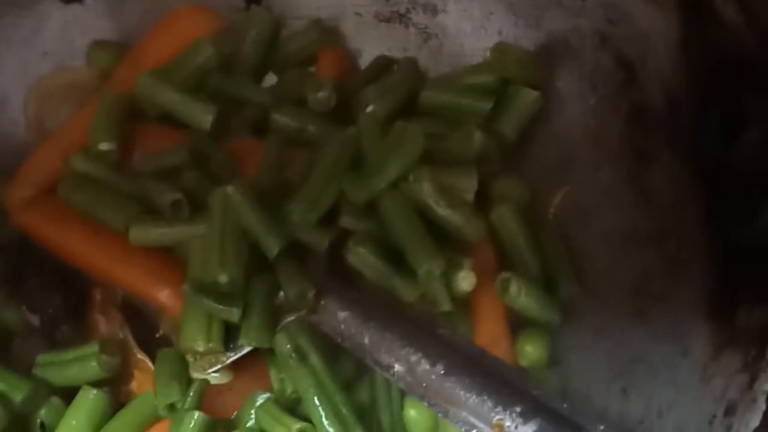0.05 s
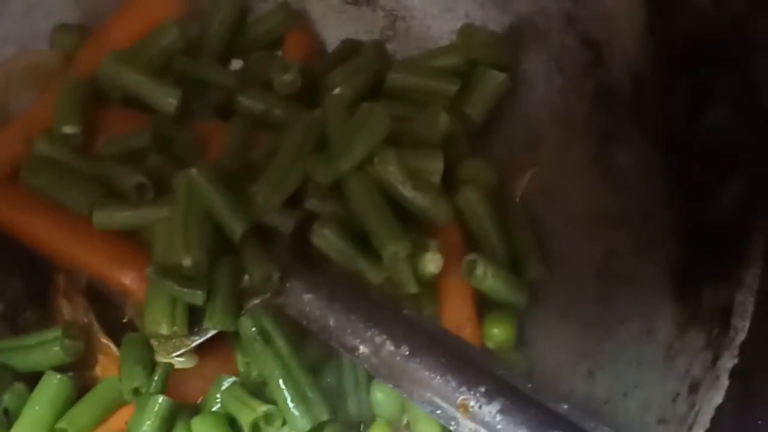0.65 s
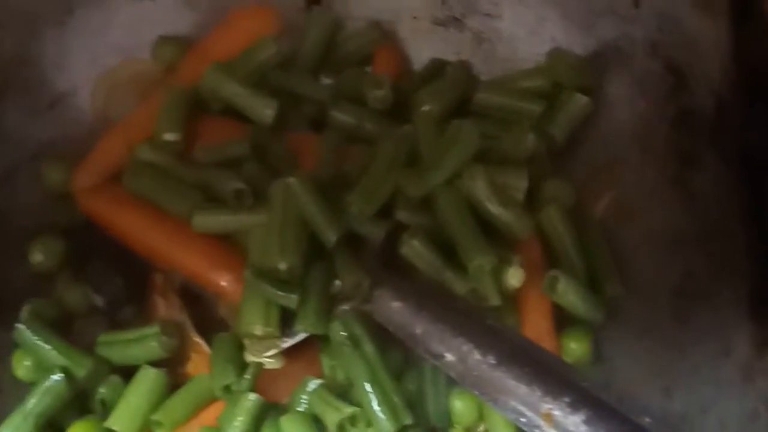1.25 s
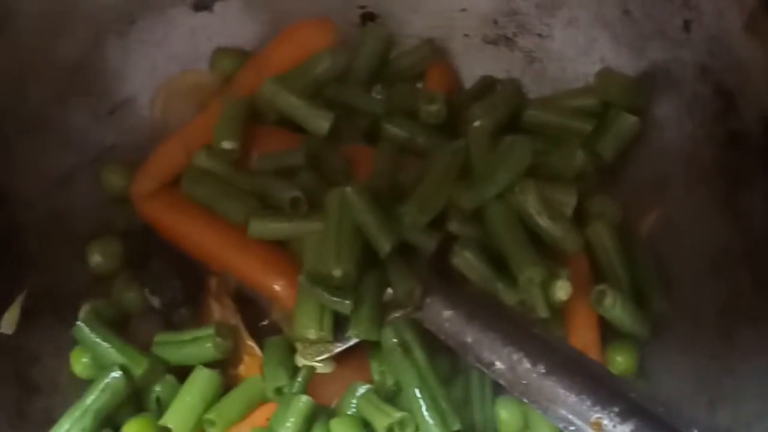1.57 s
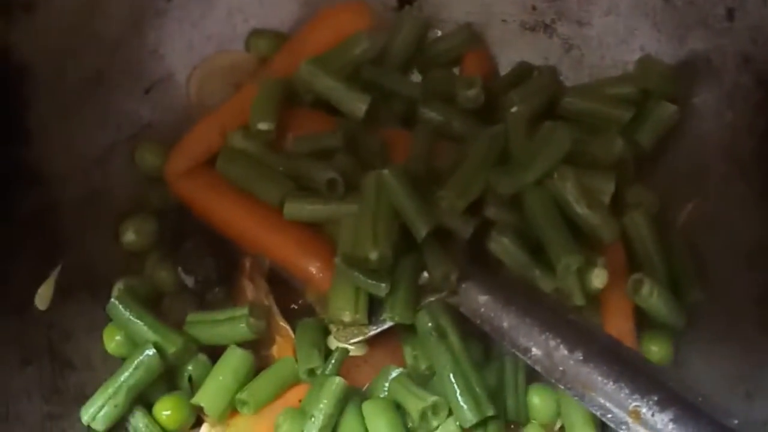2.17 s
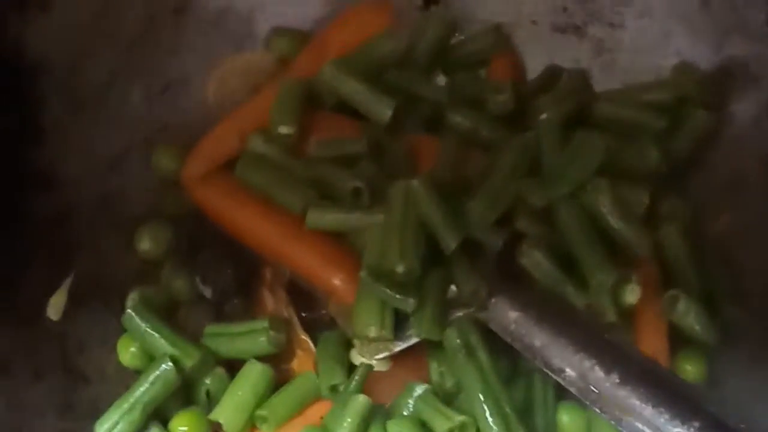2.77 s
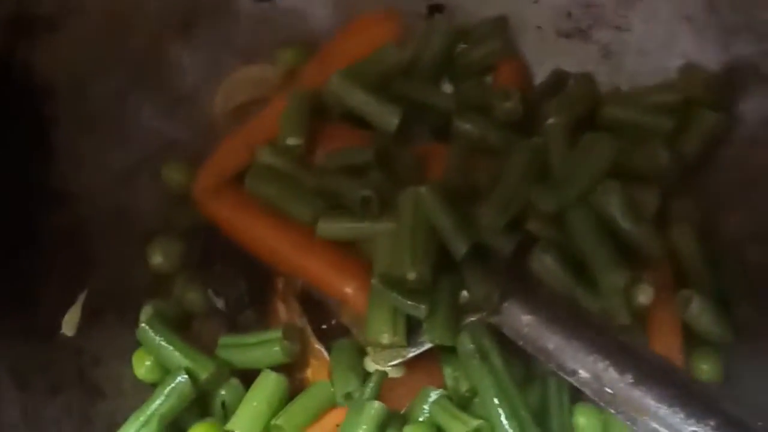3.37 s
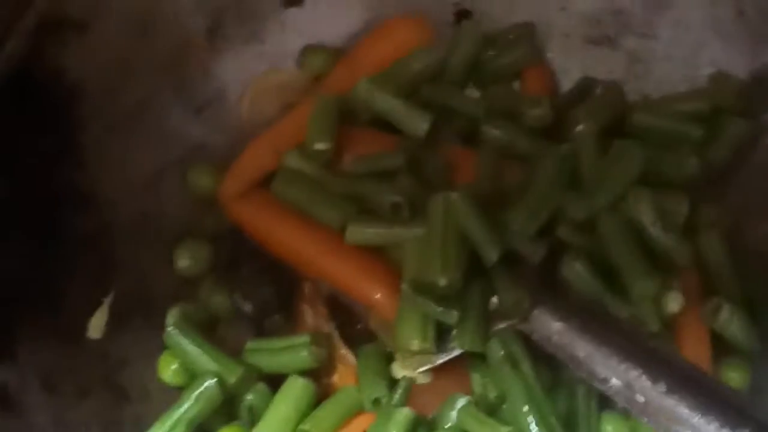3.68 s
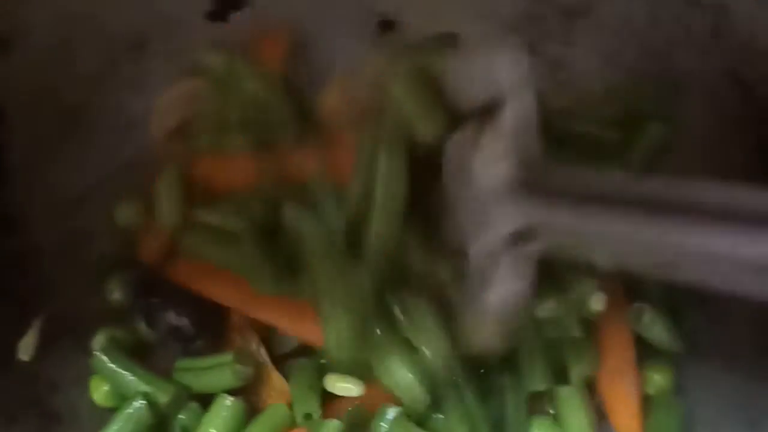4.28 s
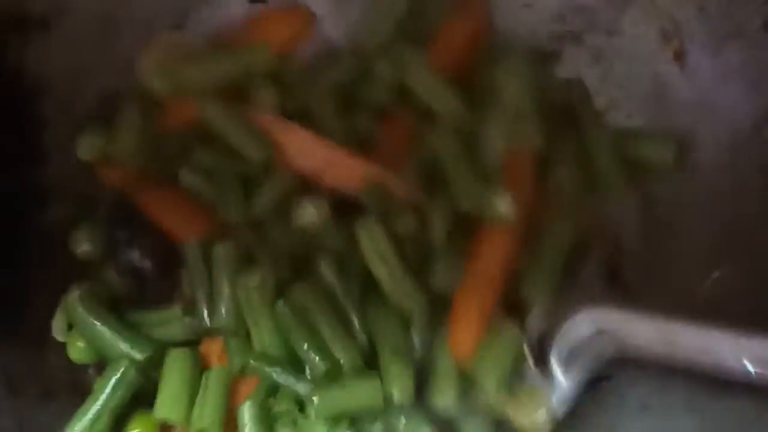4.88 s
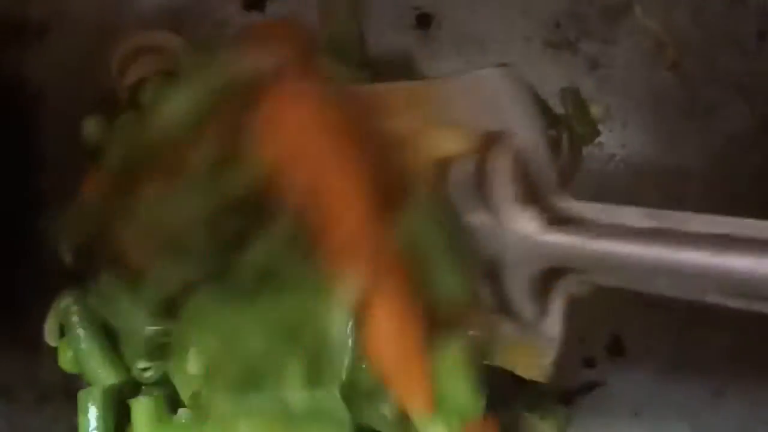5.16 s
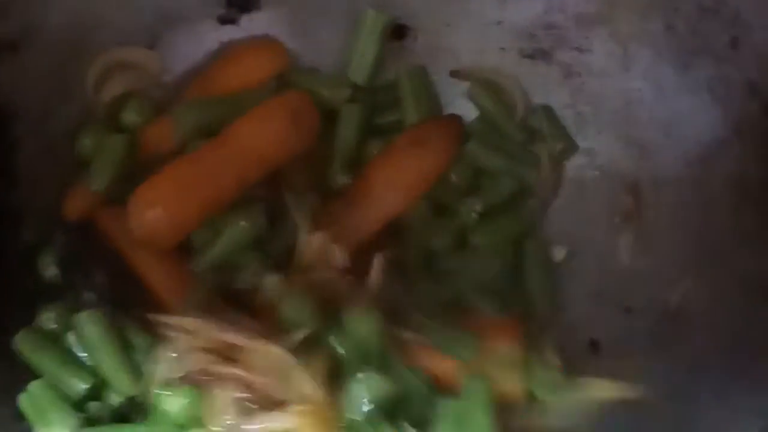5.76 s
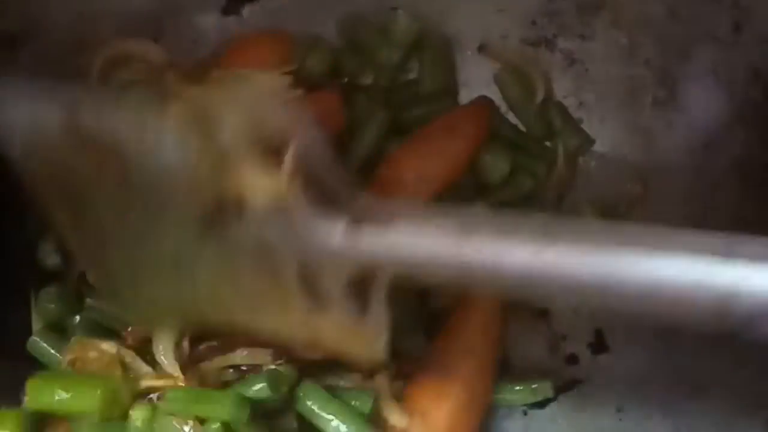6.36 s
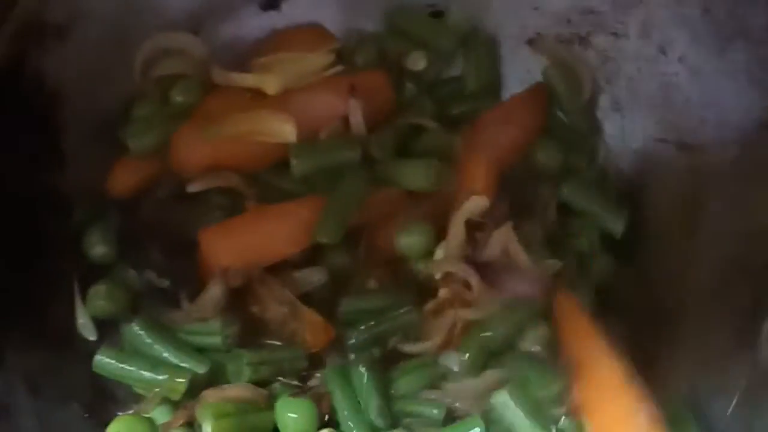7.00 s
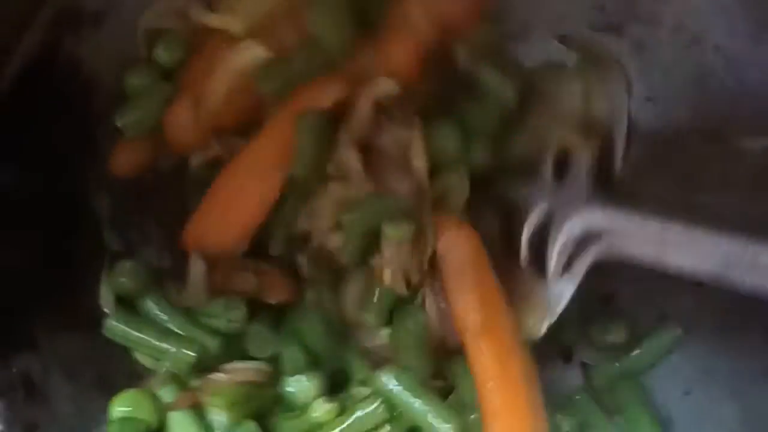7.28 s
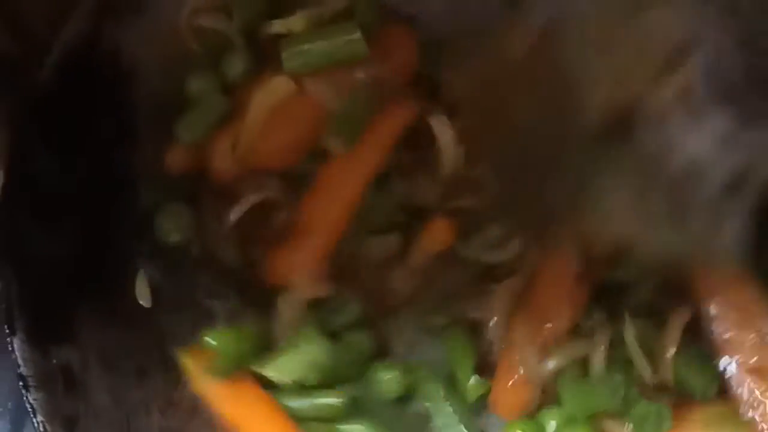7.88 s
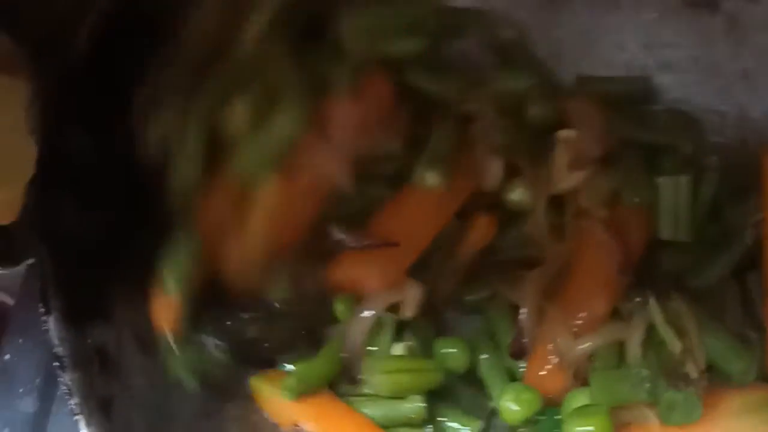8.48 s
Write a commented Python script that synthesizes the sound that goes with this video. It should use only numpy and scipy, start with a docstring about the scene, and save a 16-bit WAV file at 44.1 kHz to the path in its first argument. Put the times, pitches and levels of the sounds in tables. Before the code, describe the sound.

A bright, close sizzle of vegetables frying in a wok, joined halfway by the clacks and rasping scrapes of a metal spatula.

```python
"""A bright, crackling sizzle: vegetables fry in hot oil in a thin metal wok, close by, in a small kitchen.
Tiny steam bubbles burst all the time, larger ones spit, and the shifting pan gives soft thuds.
From about 4.5 seconds a metal spatula turns the food: its blade clacks and sets the pan ringing,
its edge sticks and slips in rasps and squeaks, the sizzle swells, and the pieces tumble back."""
import sys
import numpy as np
from scipy import signal
from scipy.fft import rfft, irfft, next_fast_len
from scipy.io import wavfile
from scipy.ndimage import uniform_filter1d

SR = 44100
rng = np.random.default_rng(int(sys.argv[2]) if len(sys.argv) > 2 else 0)


def unload_audio(sound):
    """Save the sound as a 16-bit wav file, at the path given as the first command line argument."""
    columns = np.transpose(np.atleast_2d(sound))
    # keep every value between -1 and 1, then stretch to whole-number steps
    steps = np.round(np.clip(columns, -1, 1) * 32767)
    wavfile.write(sys.argv[1], SR, steps.astype(np.int16))


N = 385434
TIME = np.arange(N) / SR
FREQS_HZ = np.fft.rfftfreq(4096, 1 / SR)  # a "colour" is one level in dB for each of these


def amp(db):
    """Turns decibels into a number to multiply by."""
    return 10 ** (np.asarray(db) / 20)


def evened(x):
    """Scales a sound to an average (rms) level of 1."""
    return x / np.sqrt(np.mean(x ** 2) + 1e-20)


def peaked(x, size=176):
    """Scales a sound so its loudest few milliseconds have level 1."""
    return x / np.sqrt(uniform_filter1d(x ** 2, size, mode="constant").max() + 1e-20)


def curve(rows):
    """Joins (time_s, value) points with straight lines."""
    return np.interp(TIME, *np.transpose(rows))


def spectrum(points):
    """Joins (pitch_hz, level_db) points into a colour."""
    hz, db = np.transpose(points)
    return np.interp(np.log(FREQS_HZ + 1), np.log(hz), db)


def bump(hz, width_hz):
    """A hill of height 1 around one pitch."""
    return 2 ** -((2 * (FREQS_HZ - hz) / width_hz) ** 2)


def coloured(x, colour):
    """Turns each pitch up or down by the colour, with no sound ahead of a hit."""
    log_gain = np.log(amp(np.concatenate([colour, colour[-2:0:-1]])))
    response = np.exp(np.conj(signal.hilbert(log_gain)))
    taps = np.fft.ifft(response).real
    return signal.oaconvolve(x, taps[:len(colour)])[:len(x)]


def resonate(x, hz, width_hz):
    """Makes a sound ring at a pitch that can move."""
    turn = np.exp(2j * np.pi * np.cumsum(hz) / SR)
    fade = np.exp(-np.pi * width_hz / SR)
    return 2 * (turn * signal.lfilter([1 - fade], [1, -fade], x / turn)).real


def drift(hz):
    """A smooth random wobble, roughly hz times a second."""
    size = next_fast_len(N, True)
    freqs = np.fft.rfftfreq(size, 1 / SR)
    slow_noise = rfft(rng.standard_normal(size)) * freqs * np.exp(-(freqs / hz) ** 2)
    return evened(irfft(slow_noise, size)[:N])


def clicks(per_s, spread_db, cap):
    """Random clicks, many small and a few up to cap * spread_db louder."""
    out = np.zeros(N)
    at = np.flatnonzero(rng.random(N) < per_s / SR)
    chance = rng.uniform(-1, 1, N)[at]
    out[at] = np.sign(chance) * amp(spread_db * np.minimum(-np.log(abs(chance)), cap))
    return out


def add(mix, start_s, sound):
    """Mixes a sound in at start_s."""
    part = mix[max(round(start_s * SR), 0):][:len(sound)]
    part += sound[:len(part)]


# overall tone of a bubble bursting in the pan: pitch_hz, level_db
BURST_TONE = [(40, -9.5), (150, -9), (650, -8), (1250, -6.5), (1600, -1.5), (2900, 0), (4500, -1.5),
              (5600, 1.5), (6800, 1), (8700, 2.5), (9600, -5.5), (12000, -5), (14500, -4.5), (15800, -6)]
# pitches that every burst sets ringing: pitch_hz, width_hz, lift_db
BURST_RINGS = [(277, 51, 2), (463, 78, 4), (817, 140, 4), (944, 123, 7), (1120, 44, 4), (1476, 58, 5.5),
               (1682, 67, 8), (1875, 150, 6.5), (2348, 430, 8.5), (7530, 1290, 5.5)]

def pan_colour():
    """The pan gives every burst the same tone, with a few pitches standing out."""
    return spectrum(BURST_TONE) + sum(db * bump(hz, width_hz) for hz, width_hz, db in BURST_RINGS)


def burst(colour, snap_s, echo_db, echo_s=0.0051, size=2048):
    """A bubble snaps, and its sound bounces briefly around the bowl."""
    t = np.arange(size) / SR
    snap = rng.standard_normal(size) * (np.exp(-t / snap_s) + amp(echo_db) * np.exp(-t / echo_s))
    power = abs(rfft(snap, 2 * size)) ** 2
    own_colour = 10 * np.log10(uniform_filter1d(power, size=91))
    return coloured(snap, colour - own_colour)


# how hard the oil fries, livelier once the food is stirred: time_s, level_db
FRYING = [(0, -33), (4.3, -31.5), (5.05, -30.5), (5.45, -29), (7.5, -27.5), (8.74, -27)]
# wet food meets hot metal and the sizzle flares: peak_s, lift_db, rise_s, fall_s
FLARES = [(0.02, 4, 0.061, 0.66), (0.72, 2.5, 0.27, .22), (1.71, 3.5, 0.11, 0.044), (3.26, 2.5, 0.12, 0.12),
          (4.8, 3, 0.28, 0.11), (5.53, 3.5, 0.24, 0.24), (6.46, 2, .1, 0.13), (6.8, 2.5, 0.22, 0.45),
          (7.95, 3, 0.15, 0.11), (8.21, 2.5, .12, 0.11)]

def frying_db():
    """How loud the oil is: steady frying with flares on top."""
    flares = sum(curve([(peak_s - rise_s, 0), (peak_s, lift_db), (peak_s + fall_s, 0)])
                 for peak_s, lift_db, rise_s, fall_s in FLARES)
    return curve(FRYING) + flares


def sizzle(sizes=28):
    """A haze of tiny bubbles under a crackle of larger ones, each size around its own pitch."""
    crackle = np.zeros(N)
    flurry = amp(2.2 * drift(18))
    # the highest-pitched bubbles vary most in strength
    for hz, spread_db in zip(np.linspace(1500, 15500, sizes), np.linspace(4.0, 5.5, sizes)):
        bubble = burst(8 * bump(hz, 4400), snap_s=0.00036, echo_db=-11.5)
        pops = clicks(per_s=800 * flurry / sizes, spread_db=spread_db, cap=5.0)
        crackle += evened(signal.oaconvolve(pops, bubble)[:N])
    crackle = amp(-3.5) * evened(coloured(crackle, pan_colour()))
    haze = clicks(per_s=7000, spread_db=2.5, cap=3.7) * amp(0.7 * drift(38))
    haze = amp(-0.5) * evened(coloured(haze, pan_colour()))
    return (crackle + haze) * amp(frying_db() + 0.5 * drift(8))


# tone of the kitchen's background: pitch_hz, level_db
HUSH_TONE = [(20, -5), (60, -7), (140, -4), (300, -13), (700, -11), (2000, -22), (8000, -47)]

def hush(level_db=-60):
    """A faint, low, steady noise fills the kitchen."""
    return amp(level_db) * evened(coloured(rng.standard_normal(N), spectrum(HUSH_TONE)))


def spit(level_db, hz, fullness_db, ring_db=4.5):
    """A water drop explodes in the oil and leaves a hollow that rings for an instant."""
    colour = pan_colour() + fullness_db * bump(1540, 2900) + ring_db * bump(hz, 0.29 * hz)
    return amp(level_db) * peaked(burst(colour, snap_s=0.00044, echo_db=-8.5))


# large bubbles that spit: start_s, level_db, pitch_hz, fullness_db (a lift below about 3500 Hz)
SPITS = [(0.0431, -18.5, 4900, 2), (0.0585, -18, 5100, -7), (0.0713, -17.5, 14500, 8),
         (0.1701, -20, 14600, 3), (0.5272, -25, 3280, 0), (0.681, -22, 14600, 2), (0.8298, -25, 7200, -1),
         (1.0213, -23, 11200, -5), (1.1602, -22.5, 5600, 7), (1.3825, -25, 14300, 11),
         (1.6766, -17.5, 9500, -2.5), (2.116, -21.5, 14600, 1.5), (2.134, -19.5, 9100, -3),
         (2.1717, -15.5, 9200, 3.5), (2.239, -23, 5400, 8), (2.4694, -20.5, 13200, 5),
         (2.5396, -26, 5430, -1), (2.8842, -26, 3030, 7), (2.9792, -22.5, 3300, 7),
         (2.997, -20, 12400, -10), (3.101, -22.5, 8100, 8), (3.446, -19, 5900, 5), (3.4974, -21, 6000, 1),
         (3.5472, -16.5, 8060, -3), (3.8255, -16.5, 14800, 8), (4.0827, -21, 5500, 7),
         (4.1992, -18, 9300, -2), (4.258, -20.5, 12400, 3), (4.342, -22.5, 12500, -7),
         (4.9489, -21.5, 3700, 5), (5.1, -21, 5500, 10.5), (5.131, -21.5, 14000, 18),
         (5.8178, -18.5, 9000, -5), (5.8803, -19.5, 3200, 7), (6.148, -17.5, 15000, 2),
         (6.5669, -17.5, 5540, -2), (7.0317, -22.5, 5300, 22), (7.1417, -18, 5670, -2),
         (7.461, -18, 8500, 2), (7.717, -15, 8800, -2), (7.7434, -23, 10200, 9), (7.7893, -19, 9300, 3)]

def spits(lesser_per_s=4.5, above_sizzle_db=6.5):
    """Large bubbles spit, and lesser ones come by chance, louder as the sizzle grows."""
    out, sizzle_db = np.zeros(N), frying_db()
    for start_s, level_db, hz, fullness_db in SPITS:
        add(out, start_s, spit(level_db, hz, fullness_db))
    for at in np.flatnonzero(rng.random(N) < lesser_per_s / SR):
        level_db = sizzle_db[at] + rng.normal(above_sizzle_db, 1.0)
        fullness_db = rng.normal(1, 6.5)
        hz = np.exp(rng.uniform(np.log(3000), np.log(15000)))
        add(out, at / SR, spit(level_db, hz, fullness_db))
    return out


# tone of a thud: pitch_hz, level_db
THUD_TONE = [(40, -20), (130, 1), (280, 5), (450, 4.5), (700, 2), (1200, 0.5), (2500, -36), (8000, -55)]
# the pan shifts or food lands: start_s, level_db, decay_s, pitch_hz
THUDS = [(0.27, -47, .07, 376), (0.399, -36.5, 0.026, 280), (0.891, -33, 0.049, 295),
         (1.102, -36, 0.047, 325), (1.19, -44, 0.15, 463), (4.49, -32.5, 0.05, 346),
         (4.708, -42, 0.06, 303), (5.255, -39, 0.062, 363), (5.486, -35.5, 0.086, 375),
         (5.829, -42, 0.11, 280), (6.796, -35.5, 0.087, 440), (8.086, -37.5, 0.12, 330),
         (8.455, -33.5, 0.1, 150)]

def thuds(size=22050):
    """Each soft blow gives one round, quickly fading note and a short low rumble."""
    out, t = np.zeros(N), np.arange(size) / SR
    fade_in = 1 - np.exp(-t / 0.0027)
    for start_s, level_db, decay_s, hz in THUDS:
        colour = spectrum(THUD_TONE) + 5.2 * bump(hz, 0.19 * hz)
        rumble = evened(coloured(rng.standard_normal(size), colour)) * np.exp(-t / decay_s)
        note_db = 4 - 90 * decay_s  # a long tumble is mostly rumble
        note = amp(note_db) * np.sin(2 * np.pi * hz * t) * np.exp(-t / 0.025)
        add(out, start_s, amp(level_db) * (rumble + note) * fade_in)
    return out


# the pan's own notes: pitch_hz, level_db, ring_s (time to fade by 60 dB)
PAN_NOTES = [(308, -11, 0.17), (530.6, -3, 0.26), (806, -4.5, 0.17), (931, -6, 0.088), (1100, -5.5, 0.2),
             (1337, -7.5, 0.15), (1494, -1, 0.12), (1767, 9, 0.036), (1950, -5, 0.05), (2034, 14, 0.032),
             (2058, 2, 0.11), (2400, -4, 0.14), (2436, 3.5, 0.052), (2850, -11, 0.091)]

def pan_ring(t, bright_db_per_octave):
    """The struck pan rings, cut short and roughened by the loose food."""
    ring = np.zeros(len(t))
    for k, (hz, level_db, ring_s) in enumerate(PAN_NOTES):
        # a hard blow favours the high notes; the low ones swell as the bending spreads over the bowl
        note_db = level_db + bright_db_per_octave * np.log2(hz / 1000) - 60 * t / ring_s
        swell = 1 - np.exp(-t / (0.0047 * (1000 / hz) ** 2))
        ring += (-1) ** k * swell * amp(note_db) * np.sin(2 * np.pi * hz * t)
    rattle = 1 + 0.33 * evened(uniform_filter1d(rng.standard_normal(len(t)), size=70))
    return peaked(ring * rattle)


# tone of the steel blade's clack: pitch_hz, level_db
CLACK_TONE = [(100, -15.5), (1000, -8.5), (1600, -20), (2400, 0), (3000, -3), (4500, -6.5), (6000, 1),
              (7550, 10.5), (8800, -3), (15500, -8)]
# the spatula hits the pan: start_s, clack_db, decay_s, ring_db, bright_db_per_octave
KNOCKS = [(4.4735, -12, 0.012, -25, -5), (4.488, -15.5, 0.0091, -17, 11), (5.4817, -12, 0.013, -29, -1),
          (5.497, -30, 0.011, -37, -1), (6.787, -25, .008, -41, 2), (6.7954, -11.5, 0.0043, -23.5, 0),
          (8.073, -14.5, 0.0066, -40, 4), (8.077, -11, 0.0046, -32, 2), (8.446, -14.5, 0.0057, -10.5, -2),
          (8.454, -24, .005, -34, 8)]

def knocks(size=16384):
    """The blade chatters for a moment against the pan and sets it ringing."""
    out, t = np.zeros(N), np.arange(size) / SR
    for start_s, clack_db, decay_s, ring_db, bright_db_per_octave in KNOCKS:
        chatter = rng.standard_normal(size) * (np.exp(-t / decay_s) + amp(-48) * np.exp(-t / 0.035))
        add(out, start_s, amp(clack_db) * peaked(coloured(chatter, spectrum(CLACK_TONE))))
        add(out, start_s, amp(ring_db) * pan_ring(t, bright_db_per_octave))
    return out


# pitches where the rubbing blade rings: pitch_hz, width_hz, level_db
BLADE_RINGS = [(1940, 160, -10), (2440, 400, -1), (3310, 1000, -1)]
# strokes of the blade along the pan: start_s, length_s, level_db, squeak_hz
STROKES = [(4.625, 0.17, -28.5, 2200), (5.09, 0.16, -40, 1880), (5.36, 0.62, -35, 1910),
           (6.28, 0.22, -40, 2350), (6.88, 0.22, -30.5, 2150), (7.78, 0.33, -33, 2300),
           (8.13, 0.42, -32.5, 2240), (8.505, .11, -29.5, 2720), (8.68, 0.14, -32.5, 2070)]

def scrapes(push_s=0.031, ease_s=0.077, climb_hz_per_s=200):
    """The edge sticks and slips: a broad rasp, and a squeak that climbs as the touching point moves."""
    pressure, pitch_hz = np.zeros(N), np.full(N, float(STROKES[0][3]))
    for start_s, length_s, level_db, squeak_hz in STROKES:
        t = TIME - start_s
        pressure += amp(level_db) * np.clip(t / push_s, 0, 1) * np.clip((length_s - t) / ease_s, 0, 1)
        climb_hz = climb_hz_per_s * (np.minimum(t, length_s) - length_s / 2)
        pitch_hz = np.where(t > 0, squeak_hz + climb_hz, pitch_hz)
    bunches = amp(3.8 * drift(58))
    slips = clicks(per_s=1400, spread_db=8.5, cap=1.1) * bunches
    blade = sum(amp(db) / (1 + (2 * (FREQS_HZ - hz) / width_hz) ** 2) for hz, width_hz, db in BLADE_RINGS)
    rasp = evened(coloured(slips, 20 * np.log10(blade + amp(-27))))
    squeak = resonate(slips, pitch_hz, width_hz=330)
    squeak = evened(resonate(squeak, pitch_hz, width_hz=330))
    # the first stroke is on bare metal and squeaks; with food under the blade it rasps more
    food = np.clip((TIME - 4.8) / 0.51, 0, 1)
    return pressure * (amp(-12 + 8.4 * food) * rasp + amp(-3.5 - 1.4 * food) * squeak)


def kitchen_echo(x, fade_s=0.44, echo_db=-13, size=16384):
    """Near walls add a short, blurred echo."""
    t = np.arange(size) / SR
    tail = rng.standard_normal(size) * amp(-60 * t / fade_s) * (t > 0.005)
    return x + amp(echo_db) * signal.oaconvolve(x, tail / np.linalg.norm(tail))[:N]


def scene():
    """Everything in the pan, heard in the kitchen, in one channel."""
    background = hush()
    pan = sizzle() + spits() + thuds() + knocks() + scrapes()
    return (kitchen_echo(pan) + background)[None]


def record(dry, top_hz=15750):
    """Rounds off the loudest peaks, then cuts the treble above top_hz."""
    treble_cut = signal.firwin(511, top_hz, window=("kaiser", 9), fs=SR)
    return signal.oaconvolve(np.tanh(dry), treble_cut[None], "same")


dry = scene()
out = record(dry)
unload_audio(out)
```